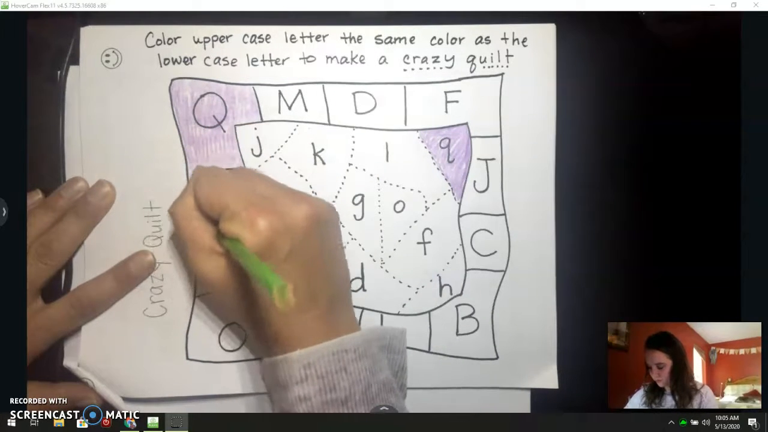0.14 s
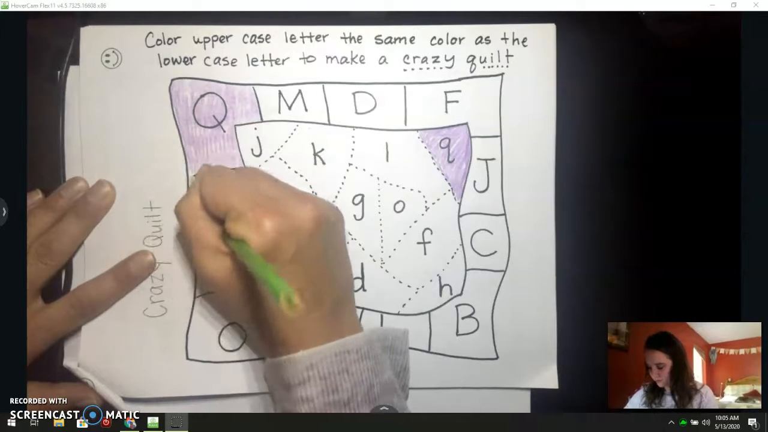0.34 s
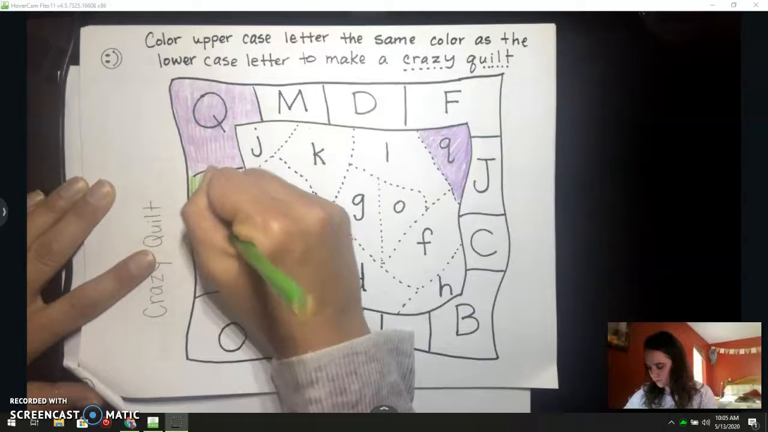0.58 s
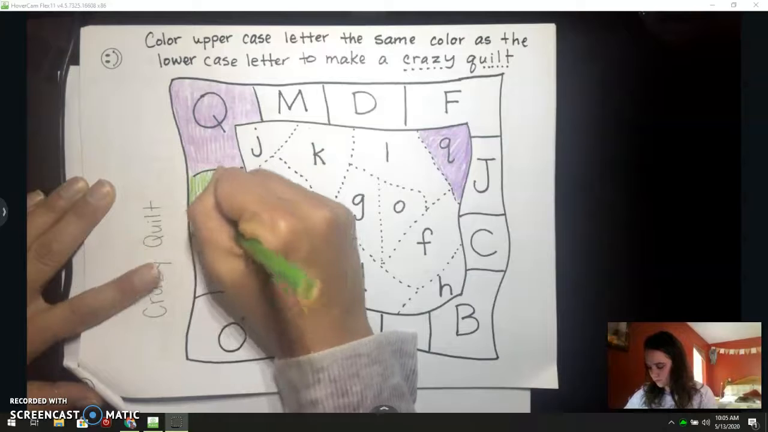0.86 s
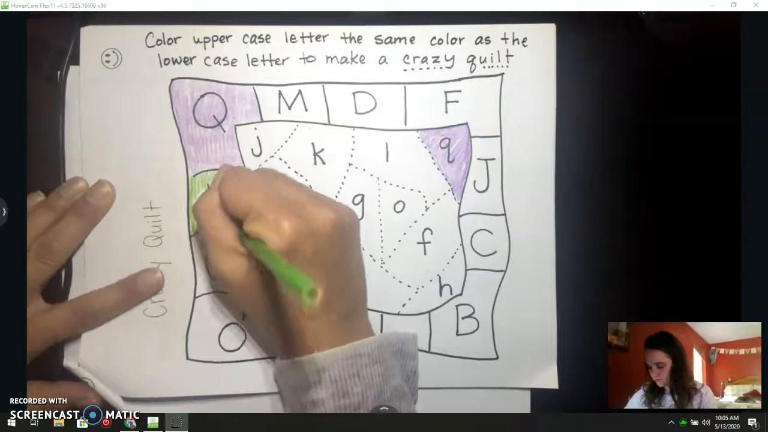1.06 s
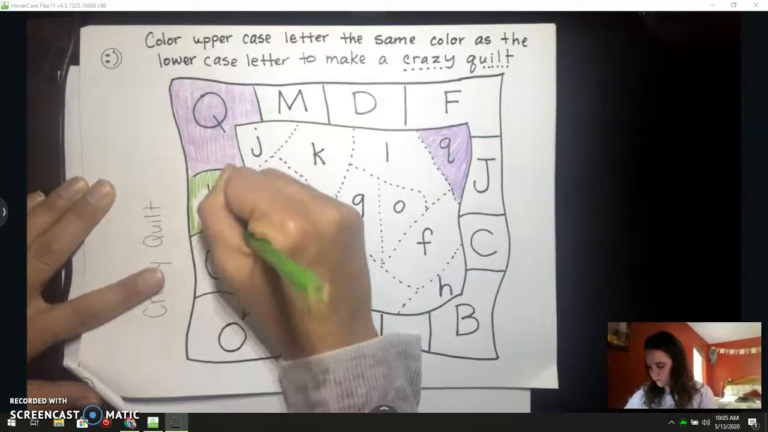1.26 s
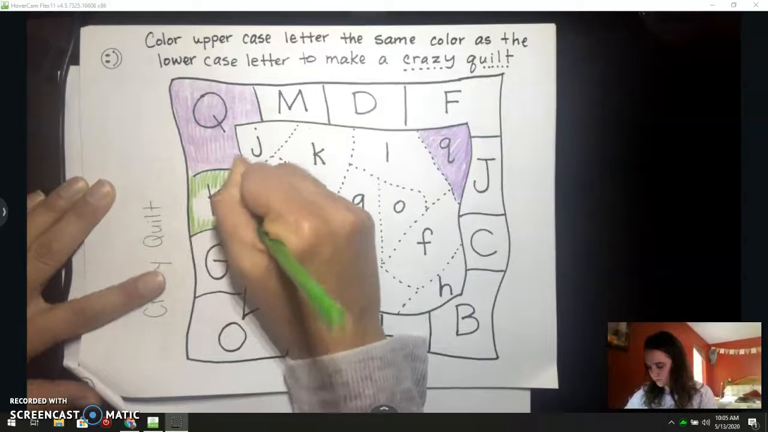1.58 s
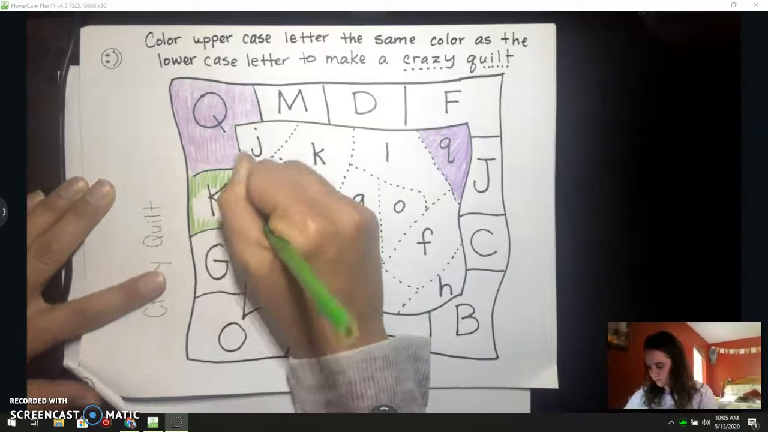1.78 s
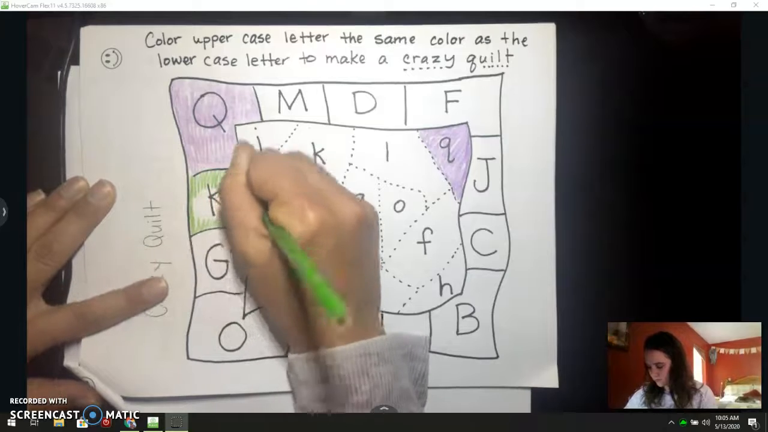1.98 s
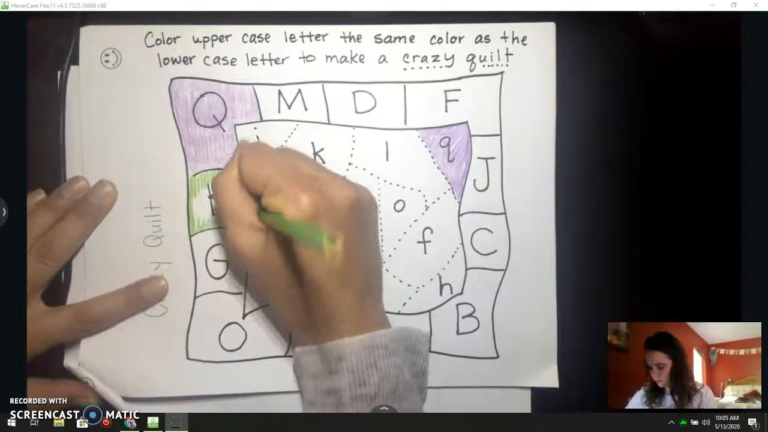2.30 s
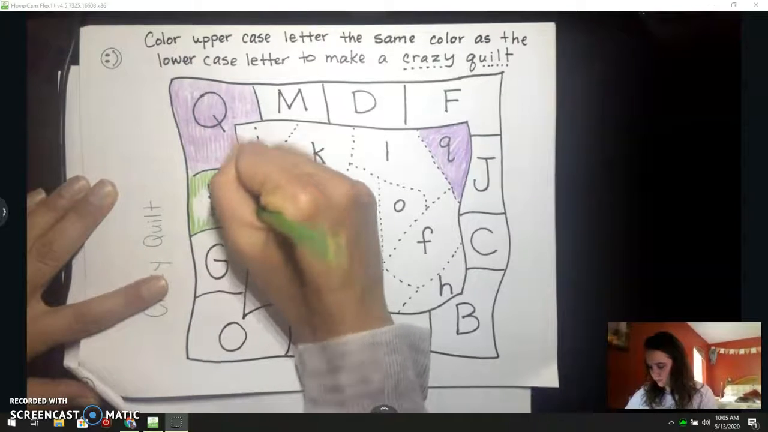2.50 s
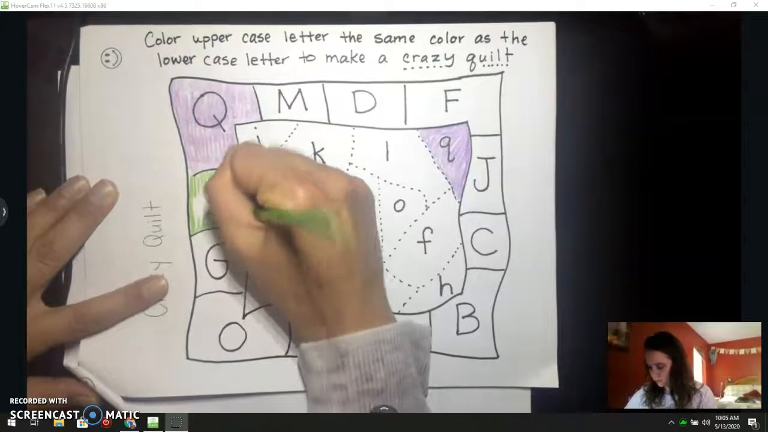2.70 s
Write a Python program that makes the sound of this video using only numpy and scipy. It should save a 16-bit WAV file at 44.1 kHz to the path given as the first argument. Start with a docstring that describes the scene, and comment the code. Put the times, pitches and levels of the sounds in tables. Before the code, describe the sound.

A coloured pencil shades paper on a desk in quick, even back-and-forth strokes. The lead rasps, with a light knock and soft thud at most turns. A close microphone picks up the small room's air and low rumble.

```python
"""Steady air and a low rumble fill a small room; the close, narrow-band microphone sways on its support.
Almost at once a coloured pencil starts shading paper on a desk, back and forth, about ten strokes a second.
The lead rasps over the paper's tooth. At most turns the pencil knocks and the desk gives a soft thud.
The room answers briefly, and the strokes go on to the end."""
import sys
import numpy as np
from scipy import signal
from scipy.fft import rfft, irfft, next_fast_len
from scipy.io import wavfile
from scipy.ndimage import map_coordinates

SR = 44100
rng = np.random.default_rng(int(sys.argv[2]) if len(sys.argv) > 2 else 0)


def unload_wav(signal):
    """Save mono or channel-first audio to the path in sys.argv[1] as 16-bit WAV at rate SR, clipped to [-1, 1]."""
    wavfile.write(
        sys.argv[1],
        SR,
        np.round(np.clip(np.atleast_2d(signal).T, -1, 1) * 32767).astype(np.int16),
    )


N = 125685


def amp(db):
    """Decibels to gain."""
    return 10 ** (np.asarray(db) / 20)


def unit(x):
    """Scale to rms 1."""
    return x / np.sqrt(np.mean(x ** 2) + 1e-20)


def filtered(x, response):
    """Apply a gain given as a function of frequency."""
    size = next_fast_len(N + 8192)
    return irfft(rfft(x, size) * response(np.fft.rfftfreq(size, 1 / SR)), size)[:N]


def coloured(x, spectrum):
    """Shape x by (freq_hz, gain_db) points; rms 1."""
    freq_hz, gain_db = np.transpose(spectrum)
    return unit(filtered(x, lambda hz: amp(np.interp(np.log(hz + 1), np.log(freq_hz + 1), gain_db))))


def wobble(knots_per_s):
    """Smooth random curve."""
    return map_coordinates(rng.standard_normal(128), [np.arange(N) * knots_per_s / SR], mode="wrap")


def fade(t, t60_s):
    """Exponential decay, 60 dB in t60_s."""
    return np.exp(-np.log(1000) * t / t60_s)


def ring(modes, rise_s, energy_s, tilt_db_per_oct=0):
    """Damped modes in a random mix, tilted up to 1 kHz; energy equals energy_s at rms 1."""
    t = np.arange(SR // 5) / SR
    x = np.zeros(len(t))
    for hz, db, t60_s in modes:
        gain = amp(db + rng.standard_normal() + tilt_db_per_oct * np.log2(min(hz, 1000)))
        x += gain * fade(t, t60_s) * np.sin(2 * np.pi * (hz * t + rng.random()))
    x *= 1 - np.exp(-t / rise_s)
    return x / np.sqrt(np.sum(x ** 2) / (energy_s * SR))


def add(track, start_s, sound):
    """Mix a sound into the track."""
    part = track[max(round(start_s * SR), 0):][:len(sound)]
    part += sound[:len(part)]


# room air: freq_hz, gain_db
AIR_SPECTRUM = [(60, -11.5), (170, -1), (210, -3), (243, 2), (280, -9), (322, -2), (370, -6), (490, -3.5),
                (660, 2), (780, -5.5), (845, 0), (885, -4.5), (940, -.5), (1060, -4.5), (1240, -.5),
                (1320, -6), (1550, -3.5), (1760, -9.5), (2200, -4.5), (2500, -10.5), (2630, -13),
                (2720, -12.5), (2900, -17.5), (3800, -19.5), (5000, -21.5), (7200, -23)]
# low rumble: freq_hz, gain_db
RUMBLE_SPECTRUM = [(12, -10.5), (26, 2.5), (37, -3.5), (47, 1), (70, -9.5), (92, -10), (125, -15.5),
                   (170, -35), (400, -63)]
# microphone support sway: time_s, level_db
SWAY_LEVELS = [(0, -40), (.45, -40), (1.4, -40.5), (1.8, -48), (2.85, -45.5)]
def air_and_sway(air_db=-56, rumble_db=-50, sway_hz=16.1):
    """Steady room air; the microphone support sways, with a low rumble that swells unevenly."""
    t = np.arange(N) / SR
    sway_db = np.interp(t, *np.transpose(SWAY_LEVELS))
    sway = np.sqrt(2) * amp(sway_db) * np.sin(2 * np.pi * sway_hz * t + rng.uniform(0, 2 * np.pi))
    swell = amp(0.12 * sway_db + 1.5 * wobble(knots_per_s=14))
    rumble = unit(swell * coloured(rng.standard_normal(N), RUMBLE_SPECTRUM))
    air = coloured(rng.standard_normal(N), AIR_SPECTRUM)
    return amp(air_db) * air + amp(rumble_db) * rumble + sway


# passes of the lead: start_s, length_s, end_level_db, half_rise_db
STROKE_PASSES = [(0.056,0.064,-65.5,0), (0.144,0.044,-63.5,0.5), (0.244,.06,-69,-3), (0.343,0.031,-66,-0.5),
                 (0.436,.048,-67,-1), (0.52,0.053,-69,-2), (0.616,.058,-64,0.5), (0.712,0.053,-70,-2.5),
                 (0.82,.056,-68.5,-1.5), (0.913,.06,-70,-2), (0.99,0.083,-65,1.5), (1.108,0.053,-70.5,-1.5),
                 (1.196,0.08,-69,-1), (1.297,0.052,-67,-2.5), (1.396,.072,-68,-1.5), (1.505,0.058,-66,-2),
                 (1.618,.079,-66.5,-0.5), (1.724,.07,-65,-2), (1.836,.079,-66.5,0), (1.937,0.066,-67,-2.5),
                 (2.046,.1,-65,-0.3), (2.167,.078,-66.5,-0.5), (2.277,.108,-66,-1), (2.403,.075,-66,-2.3),
                 (2.513,0.069,-62,1.5), (2.626,0.068,-62,-1), (2.725,.086,-63,0.7)]
def stroke_pressure(attack_s=0.0065, release_s=0.035, overhang_s=0.0073):
    """How hard the lead rubs: each stroke rises, leans towards its start or end, and lets go."""
    t, pressure = np.arange(N) / SR, np.zeros(N)
    for start_s, length_s, end_level_db, half_rise_db in STROKE_PASSES:
        attack = np.clip((t - start_s) / attack_s, 0, 1)
        release = np.clip((start_s + length_s + overhang_s - t) / release_s, 0, 1)
        progress = np.clip((t - start_s) / length_s, 0, 1)
        level_db = end_level_db - 2 * half_rise_db * (1 - progress)
        pressure += np.sin(attack * release * np.pi / 2) * amp(level_db)
    return pressure


# friction at the lead: freq_hz, gain_db
RASP_SPECTRUM = [(1300, -23.5), (1800, 3.5), (2250, 7), (2700, -8), (3250, -8.5), (3850, 1.5), (4130, -3),
                 (4420, -0.5), (4950, -9.5), (5400, -7), (5750, -6.5), (5950, -9), (6200, -4), (6550, -10),
                 (7200, -11)]
# the same friction through the desk top: freq_hz, gain_db
DESK_RUB_SPECTRUM = [(40, -6.5), (110, 6), (190, -5), (320, 4), (390, -10), (520, 1.5), (700, -6.5),
                     (900, 2), (1100, -6.5), (1600, -21), (3000, -52.5)]
def lead_rasp(slips_per_s=3500, scatter_db=3, rasp_gain_db=3, rub_gain_db=2.5):
    """Tiny slips over the paper's fibres sound from the lead and through the desk."""
    slips = (rng.random(N) < slips_per_s / SR) * rng.choice([-1, 1], N)
    slips = unit(slips * amp(scatter_db * rng.standard_normal(N)))
    friction = np.sqrt(0.5) * (slips + rng.standard_normal(N))  # equal power: grains, hiss
    rasp = amp(rasp_gain_db) * coloured(friction, RASP_SPECTRUM)
    rub = amp(rub_gain_db) * coloured(friction, DESK_RUB_SPECTRUM)
    return stroke_pressure() * (rasp + rub)


def tip_blow(pitch_hz, length_s=0.0035):
    """The few cycles of the tip's blow on the padded desk."""
    t = np.arange(int(length_s * SR)) / SR
    return np.sin(np.pi * (t / length_s) ** 0.73) * np.sin(2 * np.pi * pitch_hz * t)


# pencil and desk top modes: freq_hz, gain_db, t60_s
PENCIL_DESK_MODES = [(311.7, -14.5, 0.15), (472.5, -3.5, 0.055), (530, -2.5, 0.04), (673.4, 0, .055),
                     (826, -7.5, 0.019), (935, -3, 0.048), (1450, -13, 0.038), (2252, -2, .025)]
def knock_ring(pitch_hz, neutral_hz=724):
    """Pencil and desk top ring; a higher contact pitch favours the upper modes."""
    tilt_db_per_oct = 11 * np.log2(pitch_hz / neutral_hz)
    return ring(PENCIL_DESK_MODES, rise_s=0.0026, energy_s=0.01, tilt_db_per_oct=tilt_db_per_oct)


# slow desk modes: freq_hz, gain_db, t60_s
DESK_MODES = [(48.6, -4.5, 0.11), (79.6, 3.5, .06), (107.4, -8.5, 0.055)]
def desk_thud():
    """The desk, pushed down, swings in its slow modes."""
    return ring(DESK_MODES, rise_s=0.0057, energy_s=0.02)


# knocks at the turns: start_s, knock_db, thud_db, pitch_hz
TURNS = [(.0595, -50, -55.5, 880), (.1505, -44, -46, 646), (0.3415, -39, -43, 693), (.443, -47.5, -51, 924),
         (0.5253, -43, -46.5, 655), (.7148, -41.5, -47, 608), (.82, -47, -58, 645),
         (0.9116, -40.5, -51, 617), (1.099, -47, -54, 630), (1.2984, -43.5, -45.5, 683),
         (1.5084, -40.5, -44, 696), (1.6122, -49, -62, 780), (1.725, -45.5, -48, 724),
         (1.833, -49, -52, 740), (1.9395, -46.5, -46, 725), (2.042, -44, -54.5, 710),
         (2.1675, -46.5, -54, 640), (2.266, -47.5, -45.5, 754), (2.409, -57, -48.5, 790),
         (2.528, -47.5, -53, 660), (2.7325, -41.5, -45, 690)]
def turn_knocks(blow_gain_db=2.4, catch_gain_db=-9.5, ring_gain_db=-9, thud_gain_db=1.5):
    """The tip strikes, catches again softly, rings pencil and desk, and pushes the desk down."""
    track = np.zeros(N)
    for start_s, knock_db, thud_db, pitch_hz in TURNS:
        blow = amp(knock_db + blow_gain_db) * tip_blow(pitch_hz)
        catch_delay_s = 0.0079 * rng.uniform(0.44, 2)
        add(track, start_s, blow)
        add(track, start_s + catch_delay_s, amp(catch_gain_db) * blow)
        add(track, start_s, amp(knock_db + ring_gain_db) * knock_ring(pitch_hz))
        add(track, start_s, amp(thud_db + thud_gain_db) * desk_thud())
    return track


def room_reverb(x, t60_s=0.11, rise_s=0.0032, gain_db=-9.5):
    """Short reflections of a small furnished room."""
    t = np.arange(SR // 3) / SR
    tail = rng.standard_normal(len(t)) * fade(t, t60_s) * (1 - np.exp(-t / rise_s))
    return amp(gain_db) * signal.fftconvolve(x, tail / np.linalg.norm(tail))[:N]


def scene():
    """The pencil in its room, mono."""
    pencil = lead_rasp() + turn_knocks()
    return (pencil + room_reverb(pencil) + air_and_sway())[None]


def record(dry):
    """The microphone passes nothing above its band limit."""
    limit_hz = 7270
    return filtered(dry[0], lambda hz: hz < limit_hz)[None]


dry = scene()
out = record(dry)
unload_wav(out)
```